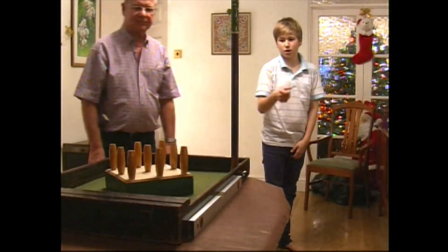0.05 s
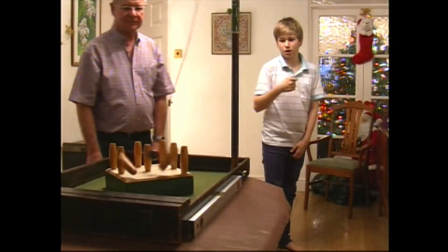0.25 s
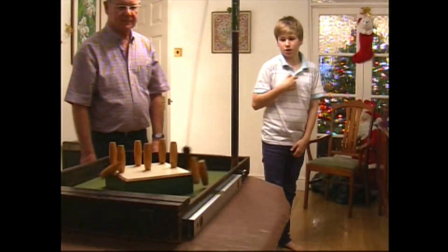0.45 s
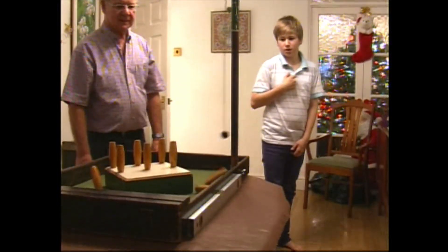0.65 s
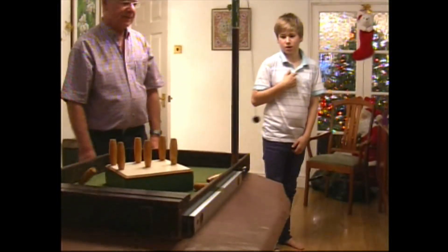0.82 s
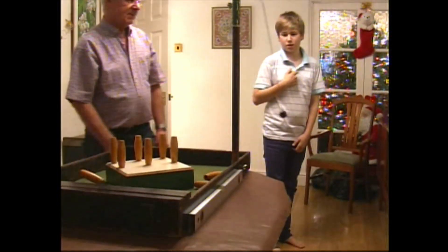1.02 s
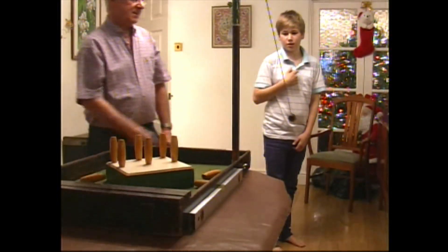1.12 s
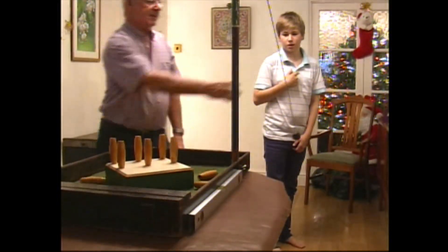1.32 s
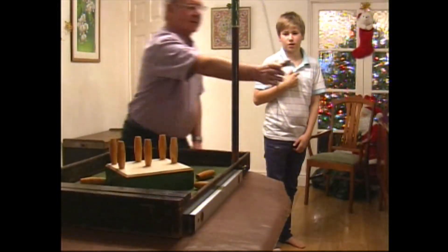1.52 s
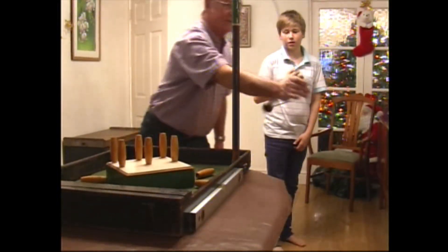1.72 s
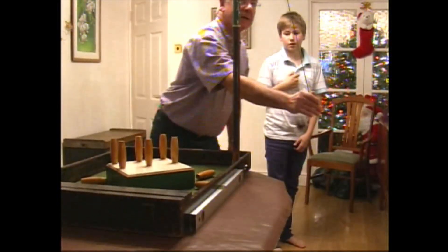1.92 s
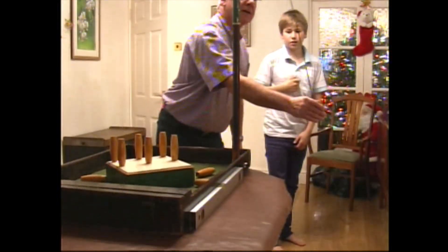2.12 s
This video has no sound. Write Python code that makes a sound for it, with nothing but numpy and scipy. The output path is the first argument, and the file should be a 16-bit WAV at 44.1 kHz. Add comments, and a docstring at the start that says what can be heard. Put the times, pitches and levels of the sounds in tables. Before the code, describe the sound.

A burst of hard wooden pin knocks, hollow box thuds and rolling, then faint shuffling and footsteps

```python
"""Skittles knocked over in a living room

A ball on a cord has swung into wooden skittles: pins clack, drop on a baize-lined table box and tumble to rest.
Each knock is a short push that sets decaying sines ringing; crowds of small random pushes make the rattles.
Soles shift and clothes rustle (grainy, coloured noise) under the knocks and after them; later, feet step.
The knocks get strong room echo and a small camera microphone's colour; hiss and a steady offset are added."""
import sys
import numpy as np
from scipy import signal
from scipy.fft import rfft, irfft
from scipy.io import wavfile

SR = 44100
rng = np.random.default_rng(int(sys.argv[2]) if len(sys.argv) > 2 else 0)


def store_wav(level_fs):
    """Save 16-bit WAV to argv[1]."""
    pcm = np.round(np.clip(np.atleast_2d(level_fs), -1, 1) * 32767)
    wavfile.write(sys.argv[1], SR, pcm.T.astype(np.int16))


def magnitude_from_level(level_db):
    """Linear magnitude for a level in decibels (20 dB per decade)."""
    exponent = np.asarray(level_db, float) / 20
    return 10 ** exponent


N = 95388  # length of the scene in samples


def rms_one(x):
    """Scale a sound to rms 1."""
    return x / np.sqrt(np.mean(x ** 2) + 1e-20)


def at_hz(points, hz):
    """Read levels or times between the points of a table, on a log-frequency axis."""
    table_hz, values = np.transpose(points)
    return np.interp(np.log(hz), np.log(table_hz), values)


def gain_curve(rows):
    """Turn a level curve into gain, practically silent outside its span."""
    start_s, level_db = np.transpose(rows)
    return magnitude_from_level(np.interp(np.arange(N) / SR, start_s, level_db, left=-120, right=-120))


def coloured(x, spectrum):
    """Give a noise the loudness over pitch of a table, at rms 1."""
    hz = np.maximum(np.arange(N // 2 + 1) * SR / N, 1)
    return rms_one(irfft(rfft(x) * magnitude_from_level(at_hz(spectrum, hz)), N))


def ring(force, hz, t60):
    """A two-pole resonator: a unit click starts a sine of height about 1 that falls 60 dB in t60 seconds."""
    decay = magnitude_from_level(-60 / (max(t60, .003) * SR))  # loss per sample
    turn = 2 * np.pi * hz / SR  # radians per sample
    feedback = [1, -2 * decay * np.cos(turn), decay * decay]
    return signal.lfilter([0, np.sin(turn)], feedback, force + 1e-18)


def contact(ms):
    """Force of one touch: a smooth bump of area 1; a longer touch excites less treble."""
    t = np.arange(200) / (SR * max(ms, .01) / 1000)
    bump = t ** 2 * np.exp(-4 * t)
    return bump / bump.sum()


def blows(rows, modes, crack_db, sign=-1):
    """Each blow rings a body's modes, best near its favoured pitch, while the rough contact crackles.

    Modes of a panel start in step (sign near 1); those of a bar alternate (sign -1)."""
    scatter_db, detune = 2.5, .012  # spread of mode level and (as a fraction) pitch from blow to blow
    focus_db_per_oct = 10.5  # loss away from the favoured pitch
    crack_ms, crack_s, crack_db_per_oct = 0.038, 0.0043, 12  # smoothing, fading time, loss for longer touches
    crack_n = 600  # samples

    luck, shift = rng.normal(0, 1, (2, len(rows), len(modes)))
    fading = np.exp(-np.arange(crack_n) / (SR * crack_s))
    grit = rng.standard_normal((len(rows), crack_n)) * fading
    rings, crack = np.zeros(N + SR), np.zeros(N + crack_n)
    hz, db, t60 = np.transpose(modes)
    for (start_s, level_db, ms, best_hz), chance, off, rough in zip(rows, luck, shift, grit):
        i = int(start_s * SR)
        octaves_away = np.abs(np.log2(hz / best_hz))
        sizes = magnitude_from_level(level_db + db - focus_db_per_oct * octaves_away + scatter_db * chance)
        for k in range(len(modes)):
            force = np.pad(contact(ms), (0, int(min(t60[k], .9) * SR)))  # leave time to ring
            tone = ring(force, hz[k] * (1 + detune * off[k]), t60[k])
            rings[i:i + len(force)] += sizes[k] * sign ** k / 2 * tone
        crack_level_db = level_db + crack_db - crack_db_per_oct * np.log2(ms / crack_ms)
        crack[i:i + crack_n] += magnitude_from_level(crack_level_db) * rough
    return rings[:N] + np.convolve(crack, contact(crack_ms))[:N]


def rattle(curve, per_s, ms, modes):
    """Small uneven touches at random times ring every mode, for half its usual ringing time."""
    sizes = magnitude_from_level(2.7 * np.minimum(rng.exponential(1, N), 3))
    touches = sizes * (rng.random(N) < per_s / SR)
    out = np.zeros(N)
    for hz, db, t60 in modes:
        # chance strengths, drawn afresh for each mode
        force = np.convolve(touches * rng.standard_normal(N), contact(ms))[:N]
        out += magnitude_from_level(db) * ring(force, hz, t60 / 2)
    return gain_curve(curve) * rms_one(out)


def rubbing(curve, spectrum):
    """Dense fibre grains brushing past each other: faint noise with frequent stronger samples."""
    fibres_per_s = 3400
    strong = rng.random(N) < fibres_per_s / SR
    grains = rng.standard_normal(N) * (0.41 + 2.0 * strong)
    return gain_curve(curve) * coloured(grains, spectrum)


def room(x):
    """Echoes of fading noise thicken after the first wall and die band by band."""
    # how long echoes take to fall 60 dB: pitch_hz, time_s
    fade_times = [(100, 1), (300, 0.73), (1000, 0.59), (3000, 0.56), (6000, 0.45), (12000, 0.26)]
    # strength of the echoes before overall scaling: pitch_hz, level_db
    echo_colour = [(80, -21), (250, -2), (1000, -4), (12000, -0.5)]
    room_db, first_echo_s, build_s = -2, 0.0015, 0.0037  # echo level against the direct sound; timing

    t = np.arange(SR) / SR
    edges = 60 * 2 ** np.arange(0, 8.1, .5)  # half-octave bands
    white = rng.standard_normal((2, SR))  # two noises, taken in turn by neighbouring bands
    tail = np.zeros(SR)
    for k, (low, high) in enumerate(zip(edges, edges[1:])):
        middle = np.sqrt(low * high)
        sos = signal.butter(2, [low, high], "band", fs=SR, output="sos")
        band = signal.sosfilt(sos, white[k % 2])
        tail += band * magnitude_from_level(at_hz(echo_colour, middle) - 60 * t / at_hz(fade_times, middle))
    tail *= np.clip((t - first_echo_s) / build_s, 0, 1)
    tail /= np.sqrt(np.sum(tail ** 2))
    return x + magnitude_from_level(room_db) * signal.fftconvolve(x, tail)[:N]


def microphone(x):
    """Colour of the housing, as a minimum-phase filter: its response comes as early as it can."""
    # loudness at each pitch: pitch_hz, level_db
    response = [(60, -28.5), (130, -11), (300, -2.5), (2000, 3), (3500, -0.5), (5300, -1.5), (6300, -5),
                (7600, -16), (8300, -6.5), (9000, 1), (10500, -6), (11800, -1), (13000, -23)]
    hz = np.maximum(np.arange(2049) * SR / 4096, 1)
    log_gain = np.log(magnitude_from_level(at_hz(response, hz)))
    # folding the cepstrum (the spectrum of the log gain) onto positive times gives minimum phase
    fold = irfft(log_gain) * np.r_[1, np.full(2047, 2), 1, np.zeros(2047)]
    return signal.fftconvolve(x, irfft(np.exp(rfft(fold))))[:N]


def hiss():
    """Steady room tone and microphone hiss: random noise given a fixed colour."""
    # relative loudness at each pitch: pitch_hz, level_db (per Hz)
    colour = [(30, 8), (90, -3), (200, -16), (500, 0.5), (1000, -5), (2000, -5.5), (3700, -9.5),
              (5100, -1.5), (6500, -12), (8000, -10), (10000, -11.5), (13000, -10.5)]
    hiss_db = -68  # rms
    return magnitude_from_level(hiss_db) * coloured(rng.standard_normal(N), colour)


def clothes():
    """Moving cloth: fibres brush together, louder with more vigorous movement."""
    # vigour of the movement: start_s, level_db (rms)
    moving = [(.3, -60.5), (.8, -61.5), (1.0, -76), (1.15, -67), (1.37, -63.5), (1.40, -57.5),
              (1.49, -59.5), (1.595, -70.5), (1.61, -59), (1.70, -66.5), (1.76, -78.5), (1.825, -73),
              (1.84, -58), (1.96, -60.5), (2.02, -72), (2.16, -70.5)]
    # relative loudness at each pitch: pitch_hz, level_db (per Hz)
    cloth = [(200, -30.5), (600, -7), (1200, -3), (2500, -0.5), (3800, -9), (5300, -3), (6500, -12),
             (8000, -17), (10500, -15.5), (13000, -25)]
    return rubbing(moving, cloth)


def shifting_soles():
    """Soles rub on the floor: the same grainy noise, with a duller colour than cloth."""
    # strength of the rubbing: start_s, level_db (rms)
    shuffle = [(0, -57.5), (.04, -61), (.9, -72), (1.1, -62.5), (1.31, -59), (1.34, -57), (1.48, -58.5),
               (1.55, -65.5), (1.65, -58), (1.80, -70.5), (1.845, -60), (1.93, -60.5), (1.98, -65.5),
               (2.16, -64)]
    # relative loudness at each pitch: pitch_hz, level_db (per Hz)
    soles = [(100, -10), (200, -5), (400, 1), (700, -4.5), (1000, -5.5), (1400, -4.5), (2000, -15),
             (4000, -25.5)]
    return rubbing(shuffle, soles)


def footsteps():
    """Feet set down on floorboards: short pushes ring the boards' modes."""
    # each step, level before modes and room: start_s, level_db, contact_ms, favoured_pitch_hz
    steps = [(1.324, -40, 0.42, 440), (1.348, -40, 0.14, 503), (1.398, -54, 0.79, 404),
             (1.821, -35.5, 0.83, 540), (1.836, -40, 0.58, 610), (1.924, -58, 0.83, 503),
             (2.04, -40.5, 0.59, 256), (2.09, -45.5, 0.81, 500)]
    # ways the boards ring: pitch_hz, level_db, time_to_fall_60_db_s
    boards = [(246, -5, 0.079), (330, -13, 0.023), (427, -1, 0.026), (562, 2.5, 0.031), (770, 5.5, 0.027)]
    return blows(steps, boards, crack_db=3, sign=0.83)


def table_box():
    """Pins land on the table box, rock against its side rail and roll on the baize."""
    # pins landing, level before modes and room: start_s, level_db, contact_ms, favoured_pitch_hz
    thuds = [(.046, -34, 0.52, 360), (.082, -31, 1, 366), (.160, -14.5, 2.1, 357), (.2745, -9, 0.64, 366),
             (.279, -12, 0.23, 680), (.286, -15, 0.47, 350), (.317, -14, 0.44, 434), (.343, -17, 1.35, 490),
             (.364, -48.5, 1.1, 465), (.3865, -12, 0.46, 547), (.3975, -13.5, 1.64, 357),
             (.408, -17.5, 0.33, 676), (.426, -13, 2.7, 440), (.449, -26.5, 3.3, 506),
             (.500, -26, 0.54, 390), (.531, -17.5, 0.42, 660), (.558, -28, 1.8, 430), (.596, -20.5, 2, 406),
             (.654, -27, 0.2, 520), (.705, -33, 2.1, 415), (.81, -20, 3, 154), (.985, -34.5, 1.2, 168)]
    # ways the box rings (time is halved for tumbling): pitch_hz, level_db, time_to_fall_60_db_s
    box = [(137.4, -17, 0.15), (153.3, -7.5, 0.98), (234, -4.5, 0.088), (266.8, -4.5, .13),
           (361.2, 3.5, 0.12), (434, -2.5, 0.087), (490, -1, 0.076), (563, -1.5, 0.049), (663, -1, 0.047),
           (797, -2, 0.029), (1040, 2, 0.031)]
    # a pin rocking on the rail, level before modes and room: start_s, level_db, contact_ms, favoured_pitch_hz
    rail_knocks = [(.5315, -23, 0.15, 1260), (.5442, -21, 0.29, 1260), (.554, -24, .3, 1260),
                   (.64, -31, 0.34, 1260)]
    # ways the rail rings: pitch_hz, level_db, time_to_fall_60_db_s
    rail = [(1093, -4, 0.05), (1260, 3, 0.09)]
    # pins rolling and rocking on the baize, rms before room: start_s, level_db
    tumble = [(.29, -39), (.33, -55.5), (.45, -33.5), (.56, -31.5), (.66, -40), (.74, -48), (.79, -85),
              (.9, -70)]
    landings = blows(thuds, box, crack_db=-9, sign=0.97)
    rocking = blows(rail_knocks, rail, crack_db=3.5)
    rolling = rattle(tumble, per_s=210, ms=0.05, modes=box)
    return landings + rocking + rolling


def skittles():
    """Hard wood on wood: short sharp touches ring the pins, which also skitter on the plinth."""
    # each clack, level before modes and room: start_s, level_db, contact_ms, favoured_pitch_hz
    clacks = [(.0456, -17, 0.051, 3730), (.0495, -28, 0.023, 1130), (.0515, -27.5, 0.1, 3190),
              (.0797, -41, 0.1, 5030), (.0838, -17, 0.073, 4900), (.0885, -17.5, 0.1, 3400),
              (.128, -26, 0.05, 1110), (.1555, -29.5, 0.02, 2880), (.1592, -14.5, 0.15, 1670),
              (.171, -22.5, 0.073, 1510), (.176, -30.5, 0.028, 1980), (.203, -34, 0.88, 1340),
              (.278, -23.5, 0.068, 1040), (.408, -16, 0.13, 1040)]
    # ways a pin rings (time is halved for skittering): pitch_hz, level_db, time_to_fall_60_db_s
    pin = [(1040, 2.5, 0.012), (1297, -1, 0.023), (1412, -3, 0.018), (1598, -6.5, 0.033), (1770, 0, 0.0096),
           (1960, -4, 0.013), (2213, -3, 0.014), (2657, 0, 0.01), (3220, 1.5, 0.007), (3735, -3, 0.015),
           (4360, 0, 0.009), (4960, 2.5, 0.016), (5780, 9, 0.007), (7040, -15, 0.018)]
    # pins skittering on the hard plinth, rms before room: start_s, level_db
    chatter = [(.047, -40.5), (.07, -46), (.125, -44), (.15, -35), (.18, -42), (.26, -49), (.3, -68.5)]
    return blows(clacks, pin, crack_db=-5) + rattle(chatter, per_s=840, ms=0.2, modes=pin)


def scene():
    """Knocks pass through room and microphone; brushing and hiss are added directly."""
    knocks = microphone(room(skittles() + table_box() + footsteps()))
    brushing = clothes() + shifting_soles()
    return (knocks + brushing + hiss())[None]  # one channel


def band_limit(x):
    """A steep low-pass at the top of the band."""
    return signal.sosfilt(signal.butter(12, 13390, fs=SR, output="sos"), x)


def record(dry):
    """The converter adds a small steady offset to the sound."""
    offset = .0045  # of full scale
    finished = dry + offset
    return band_limit(finished)


dry = scene()
out = record(dry)
store_wav(out)
```